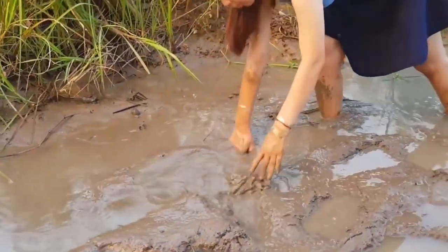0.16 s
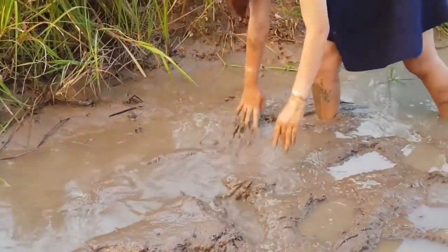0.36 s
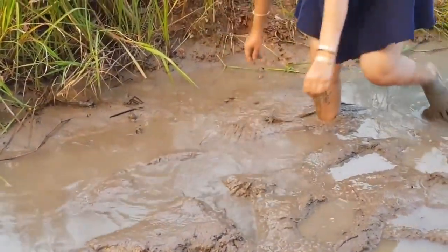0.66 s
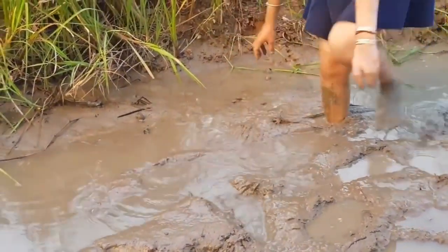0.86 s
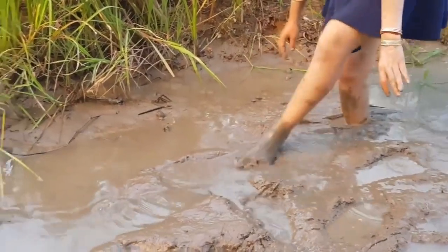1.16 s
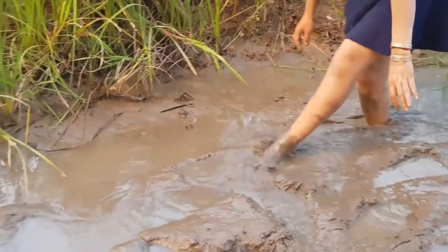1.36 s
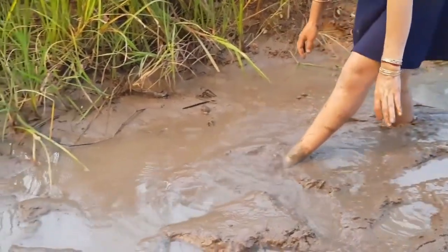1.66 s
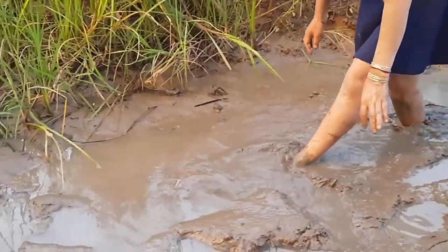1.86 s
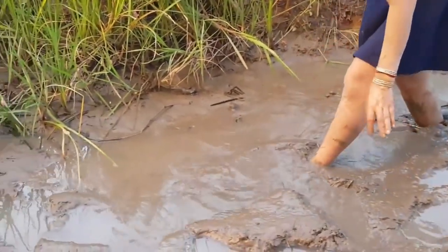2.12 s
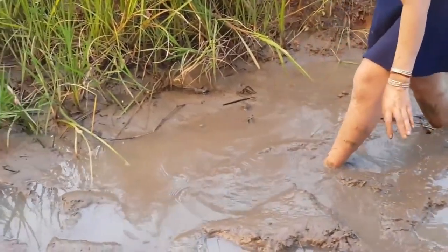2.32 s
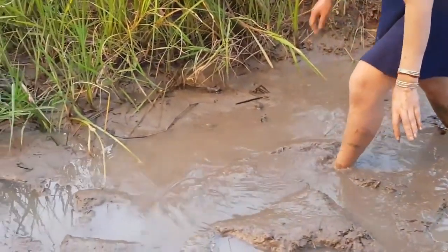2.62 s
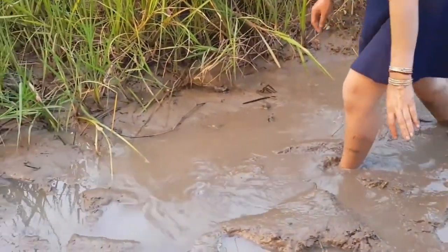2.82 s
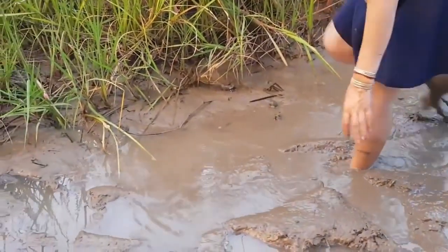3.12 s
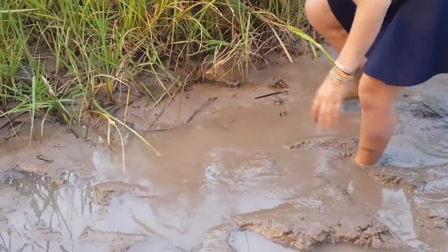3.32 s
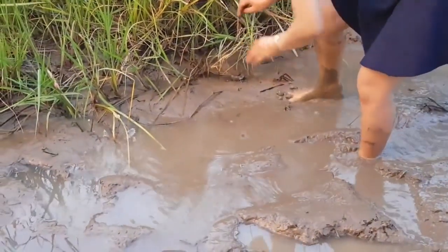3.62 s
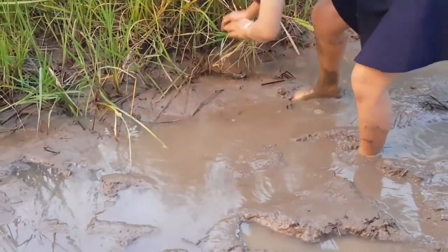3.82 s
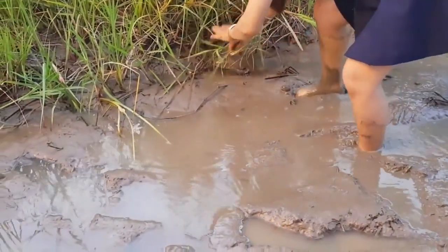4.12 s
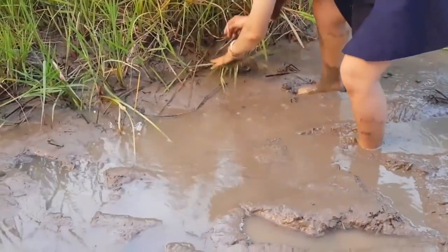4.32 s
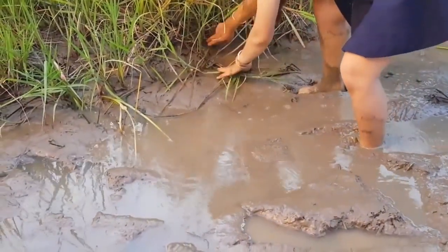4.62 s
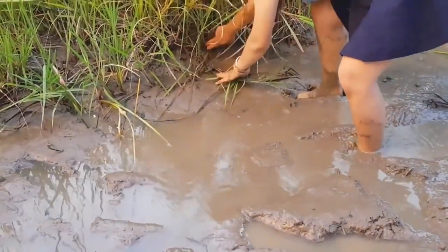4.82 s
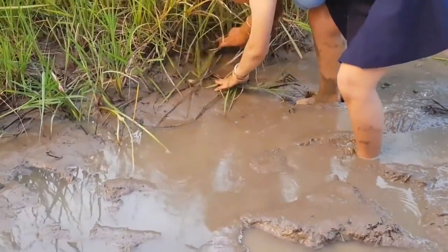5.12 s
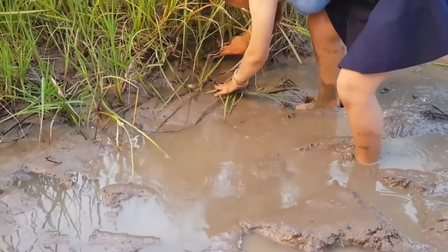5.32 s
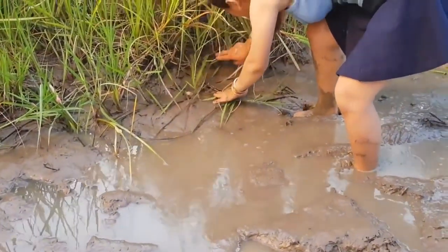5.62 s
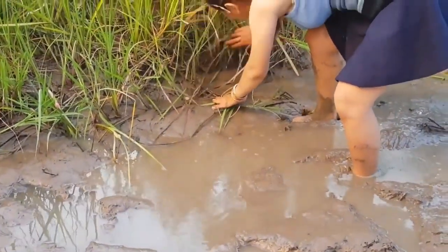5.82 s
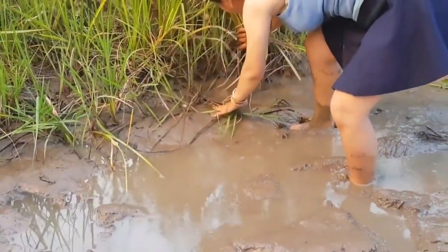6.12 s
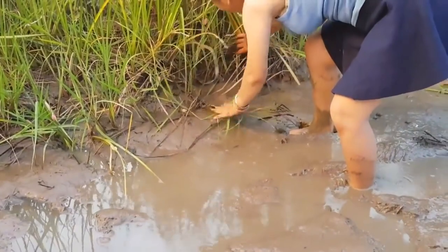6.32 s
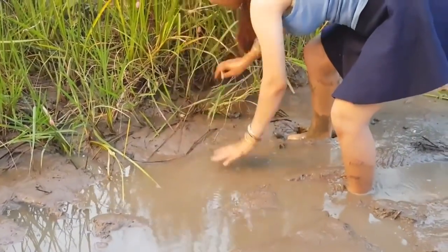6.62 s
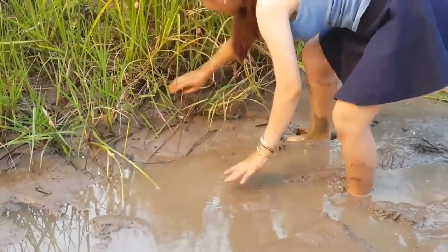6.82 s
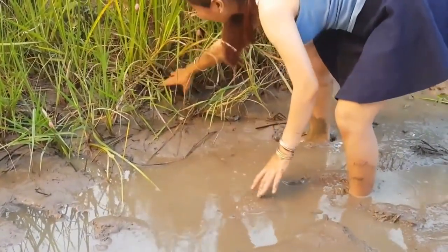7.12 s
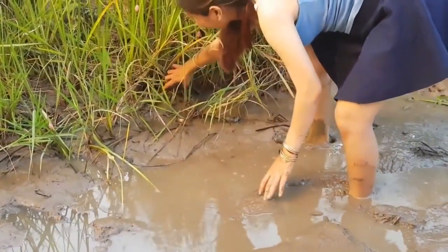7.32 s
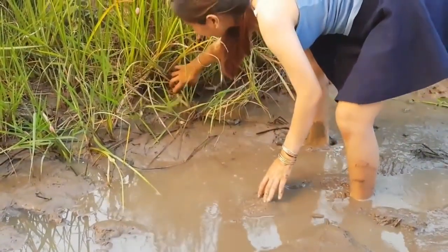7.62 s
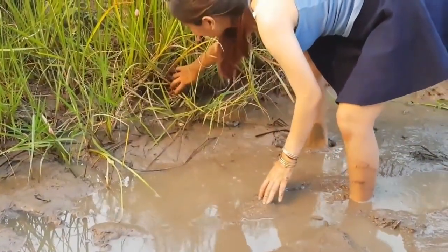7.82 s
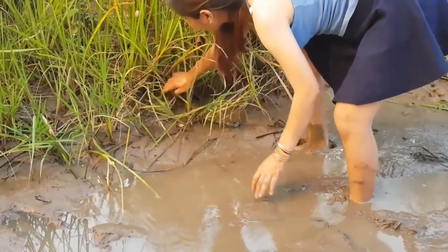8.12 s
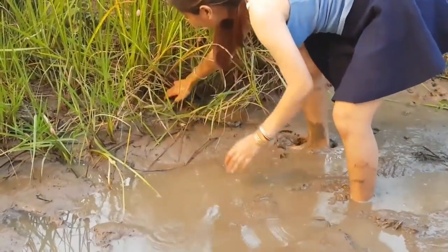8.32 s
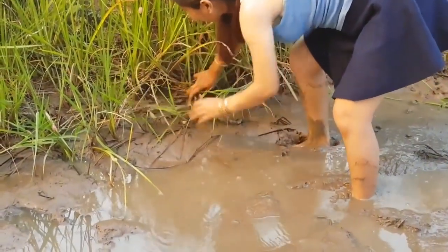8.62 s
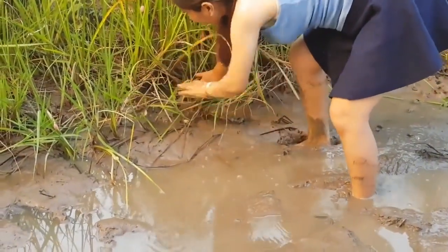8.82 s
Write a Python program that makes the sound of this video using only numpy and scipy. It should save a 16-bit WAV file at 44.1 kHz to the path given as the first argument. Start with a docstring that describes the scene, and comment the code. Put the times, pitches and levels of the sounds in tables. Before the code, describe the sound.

Mud plops and squelches under a wader amid croaking frogs, faint insects and swishing leaves; late on, wind thumps the microphone.

```python
"""Frogs in a flooded rice field

Three near frogs rasp in turn, each ringing its throat with quick pulses. Other frogs whine and croak
farther off, with crickets, peeps and a few bird chips above them and a low rumble below.
Someone wades and pulls at the stalks: air pockets plop, mud sucks shut, water gurgles, leaves swish.
Near the end, a puff of wind thumps the left microphone."""
import sys
import numpy as np
from scipy import signal
from scipy.io import wavfile

SR = 44100
rng = np.random.default_rng(int(sys.argv[2]) if len(sys.argv) > 2 else 0)


def materialize(psi):
    """Save the field psi as 16-bit PCM at rate SR to the path in sys.argv[1].

    A 1-D psi becomes a single channel; in a 2-D psi each row is a channel.
    """
    bounded = np.clip(np.atleast_2d(psi).T, -1, 1)
    quanta = np.round(bounded * 32767).astype(np.int16)
    wavfile.write(sys.argv[1], SR, quanta)


N = 395136
TIME = np.arange(N) / SR

# The tone of the far rumble and of the far chorus. Each row: frequency in Hz, relative level in dB.
RUMBLE_TONE = [(20, -13), (90, 2.5), (200, -11.5), (420, -26.5), (900, -27), (2500, -41.5)]
CHORUS_TONE = [(1300, -17.5), (1870, -4.5), (2200, -9.5), (3200, 1), (3800, 1), (4500, -6), (5800, -15.5),
               (7200, -14.5), (7900, -7.5), (8600, -13), (15500, -23.5)]
# Croaks from far away. Each row: start in seconds, level in dB.
FAR_CROAKS = [(0, -54), (0.5, -58), (0.7, -53), (.89, -59.5), (1.15, -51.5), (1.55, -58), (4.98, -55)]
# How each near frog's throat rings. Each row: frequency in Hz, relative level in dB.
FIRST_THROAT_TONE = [(1200, -25), (1900, -9), (2300, -11), (2900, -3.5), (3380, 1.5), (3510, 10.5),
                     (3640, 0), (4000, -3), (4400, -10), (5400, -16), (7000, -28)]
SECOND_THROAT_TONE = [(1350, -23.5), (1720, -3.5), (2200, -7), (2400, -10.5), (3050, -3.5), (3480, 8.5),
                      (3900, 2), (4300, -11), (5200, -15), (6000, -17.5), (7300, -26.5)]
THIRD_THROAT_TONE = [(1150, -16), (1450, -2), (2100, 1), (3400, 7.5), (4000, -1), (5000, -9.5),
                     (7000, -18.5)]
# The first near frog's croaks. Each entry: start in seconds.
FIRST_CROAK_STARTS = [1.909, 2.15, 2.391, 2.633, 2.856, 3.081, 3.299, 3.518, 3.732, 3.943, 4.153, 4.362,
                      4.568, 4.768]
# The second near frog's croaks. Each row: start in seconds, level in dB.
SECOND_CROAKS = [(6.383, -43.5), (6.619, -44.5), (6.783, -48.5), (6.946, -44.5), (6.99, -45),
                 (7.170, -39.5), (7.352, -39.5), (7.521, -41.5), (7.695, -40), (7.87, -40.5)]
# Wet snaps of mud and stalks. Each row: start in seconds, level in dB, strongest frequency in Hz.
WET_SNAPS = [(0.017, -31, 3150), (0.207, -33, 2390), (0.308, -31.5, 6200), (1.298, -41.5, 9250),
             (3.495, -34, 4470), (3.5016, -24, 2670), (3.668, -43.5, 2000), (6.171, -41.5, 2330),
             (7.654, -45, 9000), (8.328, -45, 9000)]
# Mud sucking shut. Each row: start in seconds, level in dB, starting pitch in Hz, length in seconds.
MUD_SQUELCHES = [(.072, -52, 897, 0.028), (.294, -38, 827, 0.0097), (0.697, -62, 773, .045),
                 (1.199, -48, 640, 0.0223), (1.399, -57, 652, 0.044)]
# Air pockets bursting. Each row: start in seconds, level in dB, starting pitch in Hz, fade in seconds.
MUD_PLOPS = [(0.283, -34.5, 767, 0.031), (0.734, -44, 1150, 0.023), (1.167, -31, 990, 0.016),
             (1.317, -49.5, 850, 0.1), (1.63, -52, 944, 0.07), (2.965, -31, 894, 0.059),
             (3.121, -40, 944, .05), (3.19, -39, 554, 0.044), (3.225, -36.5, 1774, 0.072),
             (3.271, -34, 1520, 0.019), (3.297, -34.5, 297, 0.039), (3.333, -33, 167, 0.041),
             (3.335, -37, 763, 0.042), (4.755, -54, 1117, .08), (4.94, -56, 1050, 0.073)]
# Stirred water. Each row: start in seconds, length in seconds, level in dB, middle bubble pitch in Hz.
WATER_SLOSHES = [(2.955, 0.21, -57.5, 1100), (3.167, 0.2, -54, 703), (4.917, 0.26, -68.5, 1186),
                 (6.86, 0.28, -67, 940), (6.961, 0.11, -67.5, 277), (7.794, 0.14, -66.5, 480)]
# Frogs that whine in turn. Each row: first start in seconds, length in seconds, starting pitch in Hz,
# first level in dB, growth per call in dB, third harmonic compared with the sixth in dB.
WHINING_FROGS = [(1.06, .23, 662, -51.5, 1.7, -7.5), (1.98, .31, 618, -54.5, .3, 4.5),
                 (2.13, .18, 692, -56, .6, -14)]
# Short whines in between. Each row: start in seconds, starting pitch in Hz, level in dB.
WHINE_REPLIES = [(.14, 616, -47.5), (.69, 654, -49), (3.18, 647, -48.5), (3.78, 624, -50.5),
                 (4.16, 639, -51), (5.26, 642, -49.5), (5.41, 624, -50.5), (5.77, 616, -56),
                 (6.48, 638.6, -45), (6.93, 665, -52.5), (8.21, 615, -55.5), (8.62, 659.5, -45)]
# Rustles of leaves and spattering mud. Each row: loudest moment in seconds, level in dB.
LEAF_RUSTLES = [(.33, -63.5), (1.3, -62), (3.2, -60.5), (3.89, -62.5), (4.37, -58.5), (5.13, -58.5),
                (5.97, -56), (6.57, -60), (7.06, -60), (7.57, -63.5), (8.65, -56)]
# The tone of the leaves and of the wind. Each row: frequency in Hz, relative level in dB.
LEAF_TONE = [(2000, -33), (5000, -7), (8500, -6), (15000, -7)]
WIND_TONE = [(20, -19), (45, 6.5), (70, 5), (230, -17), (400, -29.5)]
# Gusts. Each row: loudest moment in seconds, seconds to swell or fade by about 9 dB, level in dB.
WIND_GUSTS = [(.92, 0.51, -53), (8.15, 0.13, -44), (8.253, 0.068, -32), (8.66, 0.16, -45.5)]
# The low notes in the wind's thump. Each row: pitch in Hz, level in dB, fade in seconds.
THUMP_NOTES = [(78.3, -21.5, 0.23), (122.4, -27, 0.16), (199, -12.5, 0.044)]
# Quick runs of bird chips. Each row: start in seconds, number of chips.
BIRD_RUNS = [(4.722, 3), (4.908, 3)]


def amp(db):
    """Turns decibels into a number to multiply by."""
    return 10 ** (np.asarray(db) / 20)


def fade(t, t60):
    """A fade that drops by 60 dB every t60 seconds."""
    return amp(-60 * t / t60)


def evened(x):
    """Scales a sound to an average power of one."""
    return x / np.sqrt(np.mean(x ** 2) + 1e-20)


def clock(length):
    """The time in seconds at each sample of a short sound."""
    return np.arange(int(max(length, .005) * SR)) / SR


def add(mix, start, sound):
    """Mixes a sound in at start seconds."""
    part = mix[max(round(start * SR), 0):][:len(sound)]
    part += sound[:len(part)]


def drift(n, rate):
    """A random wobble, n samples long, that turns about rate times a second."""
    knots = rng.standard_normal(int(n / SR * rate) + 4)
    return np.interp(np.arange(n) * rate / SR + 1, np.arange(len(knots)), knots)


def colour(x, points, size=8192):
    """Shapes a sound's tone through (Hz, dB) points; white noise keeps its power."""
    hz, db = np.transpose(points)
    octave = np.log2(abs(np.fft.fftfreq(size, 1 / SR)) + 1)
    octaves_outside = abs(octave - np.clip(octave, np.log2(hz[0]), np.log2(hz[-1])))
    gain = amp(np.maximum(np.interp(octave, np.log2(hz), db) - 24 * octaves_outside, -90))
    response = np.exp(np.conj(signal.hilbert(np.log(gain))))  # rings after a pulse, never before
    taps = np.fft.ifft(response).real[:size // 2]
    return signal.oaconvolve(x, taps / np.linalg.norm(taps))[:len(x)]


def noise_pair(points, alike):
    """Shaped stereo noise; alike is the share that both sides have in common."""
    shared, left, right = rng.standard_normal((3, N))
    sides = [np.sqrt(alike) * shared + np.sqrt(1 - alike) * own for own in (left, right)]
    return np.array([colour(side, points) for side in sides])


def place(x, pan_db, lag_ms, echo_db, t60):
    """Adds echoes from banks and stalks; pan_db favours the left, lag_ms delays its direct sound."""
    t = np.arange(SR // 3) / SR
    taps = rng.standard_normal((2, len(t))) * (rng.random((2, len(t))) < .1) * fade(t, t60)
    taps /= np.linalg.norm(taps, axis=1, keepdims=True)
    echoes = signal.oaconvolve(x[None], taps, axes=1)[:, :N]
    direct = np.array([np.roll(x, round(lag_ms * SR / 1000)), x])
    return (direct + amp(echo_db) * echoes) * amp([[pan_db / 2], [-pan_db / 2]])


def strewn(db, count):
    """Starts and levels for calls from all over the field, at random moments and distances."""
    chances = rng.random((count, 2))
    return [((k + when) * N / SR / count, db - 10 * far) for k, (when, far) in enumerate(chances)]


def call_run(start, first_gap, final_gap, settle_calls, first_db, last_db, count):
    """Starts and levels for a run of calls: the gaps ease toward final_gap, the level moves evenly."""
    gaps = final_gap + (first_gap - final_gap) * np.exp(-np.arange(count) / settle_calls)
    return list(zip(start + np.cumsum(gaps) - gaps, np.linspace(first_db, last_db, count)))


def whistles(rows, length, top_hz, end_hz, spread=0):
    """Short whistles that slide downwards; spread scatters their pitch."""
    out, t = np.zeros(N), clock(length)
    for start, db in rows:
        detune = 1 + spread * rng.standard_normal() + .0356 * drift(len(t), 466)
        hz = np.linspace(top_hz, end_hz, len(t)) * detune
        tone = np.sin(2 * np.pi * np.cumsum(hz) / SR)
        add(out, start, amp(db) * tone * 2 * signal.windows.hann(len(t)))
    return out


def far_field(rumble_db=-60, chorus_db=-55.5, throb_db=2.5):
    """A low rumble, the blurred chorus of the farthest callers and stray chirps that stand out of it."""
    chorus = noise_pair(CHORUS_TONE, alike=.12) * amp(chorus_db + throb_db * drift(N, 16))
    chirps = whistles(strewn(db=-63.5, count=110), length=.045, top_hz=3550, end_hz=3300, spread=.1)
    rumble = amp(rumble_db) * noise_pair(RUMBLE_TONE, alike=.77)
    return rumble + chorus + place(chirps, pan_db=8, lag_ms=-.28, echo_db=6.5, t60=.1)


def croaks(rows, throat, length, pitch_hz, sag, jitter, uneven_db, attack, release):
    """Each croak is a run of uneven pulses that slows a little and rings the throat."""
    pulses, t = np.zeros(N), clock(length + 2 * release)
    for start, db in rows:
        tuning, held, effort = np.exp(.06 * rng.standard_normal(3))  # no two croaks are alike
        rate = pitch_hz * tuning * (1 - sag * t / length + jitter * drift(len(t), 400))
        beats = np.diff(np.floor(np.cumsum(rate) / SR), prepend=-1) > 0
        rasp = evened(beats * amp(uneven_db * drift(len(t), 302.4)))
        swell = np.minimum((t + .014) / attack, 1)
        tail = np.exp(-2 * np.maximum(t - length * held, 0) / release)
        add(pulses, start, amp(db) * effort ** 2 * swell * tail * rasp)
    return colour(pulses, throat)


def croaking_frogs(first_db=-41):
    """Three near frogs take turns, the third getting faster and louder; far ones croak throughout."""
    first = croaks([(start, first_db) for start in FIRST_CROAK_STARTS], FIRST_THROAT_TONE, length=.049,
                   pitch_hz=451, sag=.07, jitter=.045, uneven_db=2, attack=.001, release=.023)
    second = croaks(SECOND_CROAKS, SECOND_THROAT_TONE, length=.046,
                    pitch_hz=429, sag=.075, jitter=.033, uneven_db=4, attack=.001, release=.004)
    third_run = call_run(start=7.47, first_gap=.189, final_gap=.158, settle_calls=3,
                         first_db=-51.5, last_db=-47.5, count=9)
    third = croaks(third_run, THIRD_THROAT_TONE, length=.053,
                   pitch_hz=457.6, sag=.17, jitter=.035, uneven_db=2.5, attack=.03, release=.05)
    far = croaks(FAR_CROAKS + strewn(db=-58.5, count=45), SECOND_THROAT_TONE, length=.07,
                 pitch_hz=447, sag=.072, jitter=.025, uneven_db=5.5, attack=.022, release=.011)
    return (place(first, pan_db=-4, lag_ms=.22, echo_db=-4, t60=.18)
            + place(second, pan_db=-.5, lag_ms=.48, echo_db=-4, t60=.099)
            + place(third, pan_db=1, lag_ms=.49, echo_db=3, t60=.11)
            + place(far, pan_db=1.5, lag_ms=0, echo_db=4.5, t60=.11))


def snap(hz, t60=.018):
    """Mud or a stalk snaps with a tiny burst of noise."""
    t = clock(2 * t60)
    burst = colour(rng.standard_normal(len(t)) * fade(t, t60), [(.7 * hz, -3), (hz, 0), (4 * hz, -24)])
    return burst / abs(burst).max()


def squelch(hz, length, octaves=1.67, sputters_per_s=600, sputter_db=5):
    """A hollow in the mud closes: its ring swells, sputters and sweeps raggedly upwards."""
    t = clock(length)
    pitch = hz * 2 ** (octaves * (t / length) ** 2 + .22 * drift(len(t), sputters_per_s))
    ring = np.sin(2 * np.pi * np.cumsum(pitch) / SR) * np.sin(np.pi * t / length)
    return ring * amp(sputter_db * drift(len(t), sputters_per_s))


def bubble(hz, t60, rise=7):
    """An air pocket rings, and its pitch rises as it nears the surface."""
    t = clock(t60)
    return np.sin(2 * np.pi * hz * t * (1 + rise * t / 2)) * fade(t, t60) * np.minimum(t * hz / 2, 1)


def plop(hz, t60, smack_share=.25):
    """An air pocket bursts in the mud: a bubble's ring with a wet smack."""
    t = clock(t60)
    smack = colour(rng.standard_normal(len(t)), [(hz, 0), (2 * hz, -6)]) * fade(t, t60)
    return bubble(hz, t60) * (1 - smack_share) + smack * smack_share


def wading(drip_count=11, dripping_s=1.8, drip_db=-54, lowest_drip_hz=1050):
    """Feet and hands work the mud and stir the water; early on, the lifted hands drip."""
    out = np.zeros(N)
    for start, db, hz, t60 in MUD_PLOPS:
        add(out, start, amp(db) * plop(hz, t60))
    for start, db, hz, length in MUD_SQUELCHES:
        add(out, start, amp(db) * squelch(hz, length))
    for start, db, hz in WET_SNAPS:
        add(out, start, amp(db) * snap(hz))
    for start, length, db, hz in WATER_SLOSHES:
        add(out, start, amp(db) * gurgle(length, hz))
    for when, pitch in rng.random((drip_count, 2)):
        add(out, when * dripping_s, amp(drip_db) * bubble(lowest_drip_hz * 2 ** pitch, t60=.03))
    return place(out, pan_db=2.5, lag_ms=0, echo_db=-5.5, t60=.21)


def whine(length, pitch_hz, third_db, rise=.72, side_db=-16, flutter_db=2):
    """A hoarse, rising call that swells late and breaks off; the throat favours harmonics 3 and 6."""
    t = clock(length)
    bend = rise * length * t  # longer calls climb more steeply
    phase = 2 * np.pi * np.cumsum(pitch_hz * (1 + bend + .005 * drift(len(t), 800))) / SR
    harmonics = {3: third_db, 4: side_db, 5: side_db, 6: 0, 7: side_db}
    tone = sum(amp(db + flutter_db * drift(len(t), 87.4)) * np.sin(k * phase)
               for k, db in harmonics.items())
    return tone * np.sqrt(np.sin(np.pi * (t / length) ** 2))


def whining_frogs(cycle_s=2.19, faint_count=95, faint_db=-60):
    """Frogs whine in turn and others reply, over many faint ones from across the field."""
    out = np.zeros(N)
    for first, length, hz, db, growth_db, third_db in WHINING_FROGS:
        for k, start in enumerate(np.arange(first, N / SR, cycle_s)):
            add(out, start, amp(db + k * growth_db) * whine(length, hz, third_db))
    for start, hz, db in WHINE_REPLIES:
        add(out, start, amp(db) * whine(length=.14, pitch_hz=hz, third_db=-5.5))
    for when, size, pitch in rng.random((faint_count, 3)):
        call = whine(length=.05 + .11 * size, pitch_hz=595 + 60 * pitch, third_db=-3.5)
        add(out, when * N / SR, amp(faint_db) * call)
    return place(out, pan_db=2.5, lag_ms=.46, echo_db=-10, t60=.35)


def leaves(swell_s=.11, grain_db=.5, catch_db=1, crackles_per_s=300, crackle_db=-3):
    """Sliding leaves and spattering mud make grainy swishes with a fine crackle."""
    strength = sum(amp(db) * np.exp(-abs(TIME - peak) / swell_s) for peak, db in LEAF_RUSTLES)
    swish = noise_pair(LEAF_TONE, alike=.086) * amp(grain_db * drift(N, 600) + catch_db * drift(N, 25))
    ticks = rng.standard_normal(N) * (rng.random(N) < crackles_per_s / SR)
    crackle = amp(crackle_db) * colour(evened(ticks), LEAF_TONE)
    return (swish + crackle) * strength * amp([[2], [-2]])  # a little to the left


def peeps():
    """A caller peeps ten times, ever more slowly."""
    run = call_run(start=.51, first_gap=.185, final_gap=.27, settle_calls=5,
                   first_db=-55.5, last_db=-57, count=10)
    return whistles(run, length=.0776, top_hz=3260, end_hz=2820)


def wind(thump_s=8.238, attack_s=.0064):
    """Lumpy gusts hit mostly the left microphone; the strongest lands as a thump."""
    strength = sum(amp(db) * np.exp(-abs(TIME - peak) / swell) for peak, swell, db in WIND_GUSTS)
    gusts = colour(rng.standard_normal(N), WIND_TONE) * strength
    t = clock(.3)
    thump = sum(amp(db) * fade(t, t60) * np.sin(2 * np.pi * hz * t) for hz, db, t60 in THUMP_NOTES)
    add(gusts, thump_s, thump * np.minimum(t / attack_s, 1))
    return gusts * amp([[0], [-16]])


def cricket(start, end, period, length, strokes_per_s, ring_hz, width_hz, db):
    """Wing strokes make regular, ringing chirps that grow louder until the song stops."""
    strokes, t = np.zeros(N), clock(length)
    chirp = np.sin(np.pi * strokes_per_s * t) ** 2 * signal.windows.tukey(len(t), .5)
    for when in np.arange(start, end, period):
        swell = np.sin(np.pi * (.18 + .32 * (when - start) / (end - start)))
        add(strokes, when, swell * chirp)
    wing_tone = [(ring_hz - 2 * width_hz, -35), (ring_hz - width_hz / 2, 0),
                 (ring_hz + width_hz / 2, 0), (ring_hz + 2 * width_hz, -35)]
    return amp(db) * strokes * colour(rng.standard_normal(N), wing_tone)


def gurgle(length, hz, bubbles_per_s=150, octaves=.46, size_db=5, t60=.029, swish_db=-1):
    """A swarm of small bubbles of mixed pitch and size, inside the lumpy swish of moving water."""
    swarm = np.zeros(len(clock(length + t60)))
    n = len(swarm)
    for pitch, size in rng.standard_normal((int(length * bubbles_per_s) + 1, 2)):
        ring = bubble(hz * 2 ** (octaves * pitch), t60, rise=14)
        add(swarm, length * rng.random(), amp(size_db * np.tanh(size)) * ring)
    lumps = rng.standard_normal(n) * amp(size_db * drift(n, bubbles_per_s)) * signal.windows.tukey(n)
    swish = colour(lumps, [(hz / 4.27, 3), (hz / 1.8, -11), (hz, 0), (hz * 3, -20)])
    return evened(evened(swarm) + amp(swish_db) * evened(swish))


def bird(gap_s=.033, db=-57):
    """A bird chips in two quick runs of high, falling whistles."""
    chips = [(start + k * gap_s, db) for start, count in BIRD_RUNS for k in range(count)]
    return whistles(chips, length=.027, top_hz=5320, end_hz=4180)


def scene():
    """All the callers in their places, with the wader, the wind and the far field."""
    frogs = croaking_frogs()
    crickets = cricket(start=1.1, end=5.1, period=.15, length=.11,
                       strokes_per_s=79, ring_hz=6890, width_hz=360, db=-66.5)
    crickets += cricket(start=1.53, end=3.4, period=.114, length=.082,
                        strokes_per_s=120, ring_hz=9290, width_hz=520, db=-63)
    frogs += whining_frogs()
    high_callers = place(peeps() + bird() + crickets, pan_db=10, lag_ms=0, echo_db=-5, t60=.23)
    return frogs + high_callers + wading() + leaves() + wind() + far_field()


def record(dry):
    """The recorder cuts off the very highest treble."""
    treble_cut = signal.firwin(511, cutoff=15850, window=("kaiser", 9), fs=SR)
    return signal.oaconvolve(dry, treble_cut[None], "same")


dry = scene()
out = record(dry)
materialize(out)
```